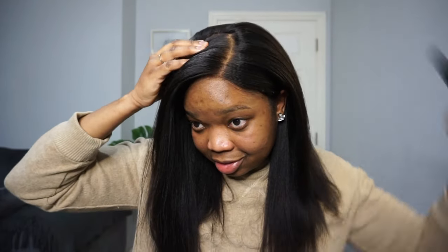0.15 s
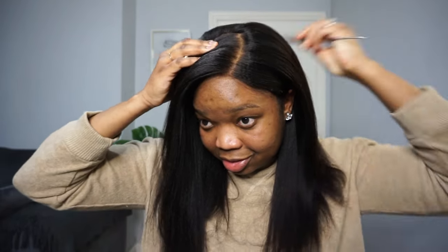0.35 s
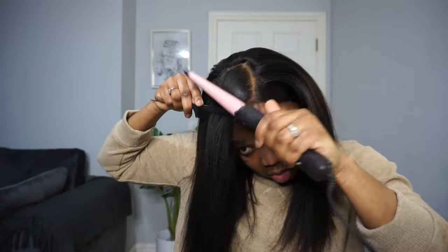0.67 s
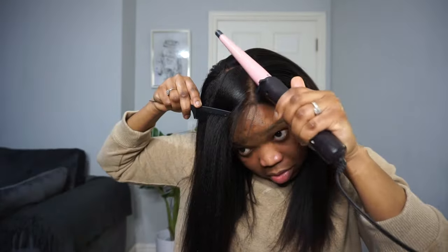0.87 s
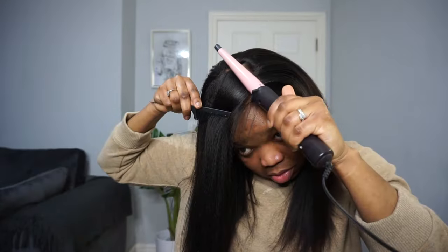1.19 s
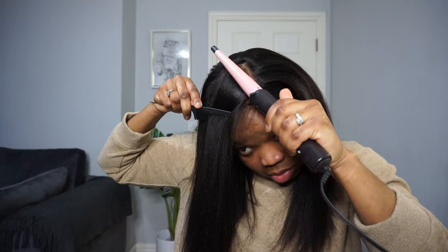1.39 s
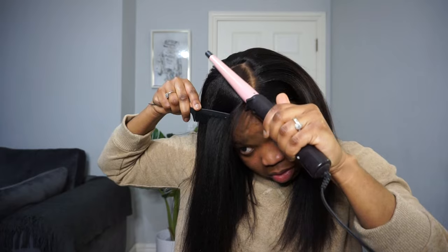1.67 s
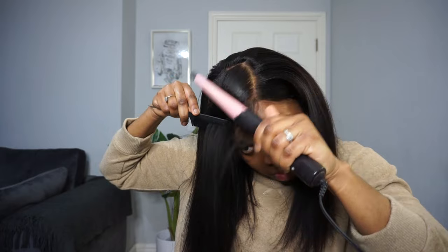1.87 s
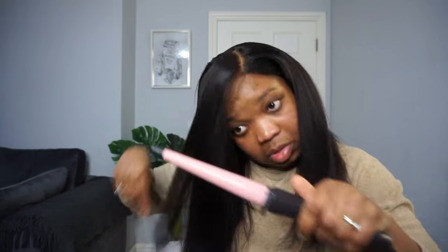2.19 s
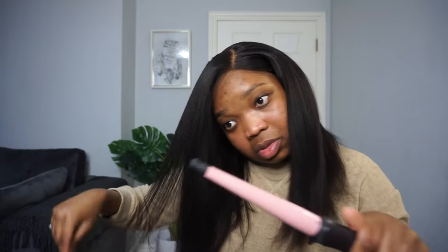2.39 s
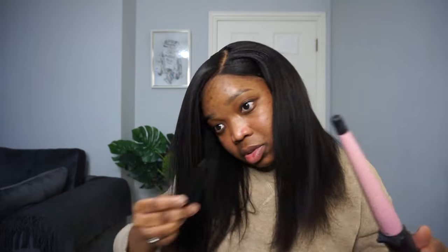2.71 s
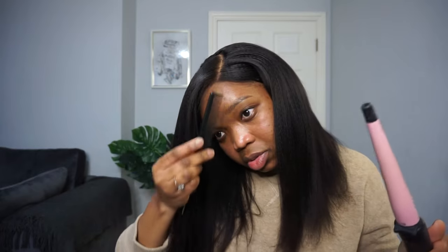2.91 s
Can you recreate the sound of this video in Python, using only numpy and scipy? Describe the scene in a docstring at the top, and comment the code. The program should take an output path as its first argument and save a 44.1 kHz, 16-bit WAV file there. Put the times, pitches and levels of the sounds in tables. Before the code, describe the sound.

Plastic hair tools knock lightly in a small room. Soft swishes of a comb through hair come first, then a few separate hollow knocks, then a quick clatter, with sleeves rustling near the microphone over faint hiss.

```python
"""In a small furnished room, hair is combed and curled while plastic tools and their cord knock about.
Each knock is a short crack with a hollow ring. It arrives dull along the partly blocked direct path,
then brighter off nearby walls. Between knocks, comb, hair and sleeves rub and swish softly, with one
light tick of the comb and one faint squeak. A low hiss and hum lie under it all."""
import sys
import numpy as np
from scipy import signal
from scipy.fft import rfft, irfft, next_fast_len
from scipy.io import wavfile

SR = 44100
rng = np.random.default_rng(int(sys.argv[2]) if len(sys.argv) > 2 else 0)


def generate_wav(sig):
    """Save sig (samples, or channels by samples) to the path in sys.argv[1] as 16-bit PCM at SR."""
    pcm = np.round(np.clip(np.atleast_2d(sig).T, -1, 1) * 32767).astype(np.int16)
    wavfile.write(sys.argv[1], SR, pcm)


N = 134505

# The tone of the crack when plastic is hit. Each row: frequency in Hz, gain in dB.
CRACK_TONE = [(50, -4), (100, -17.5), (220, 6), (380, 14.5), (560, 2), (1000, 6), (1500, 9), (2500, 9),
              (3500, 0), (5200, -2.5), (6400, -8), (8500, -12.5), (13500, -15.5), (16000, -35)]
# How alike the room sounds left and right. Each row: frequency in Hz, likeness (1 means the same).
ROOM_STEREO = [(150, 0.97), (400, 0.93), (700, 0.28), (1200, 0.44), (3000, 0.039), (12000, .02)]


def amp(db):
    """Turn decibels into a gain to multiply by."""
    return 10 ** (np.asarray(db) / 20)


def unit(x):
    """Scale a signal to an average (rms) level of 1."""
    return x / np.sqrt(np.mean(x ** 2))


def pan(db):
    """Left and right gains. A pan is how many dB louder the left side is than the right."""
    return amp(np.array([[db], [-db]]) / 2)


def fade(t, t60):
    """A smooth decay that falls 60 dB in t60 seconds, the fade time."""
    return np.exp(-np.log(1000) * t / t60)


def lookup(points, hz):
    """Read between the rows of a (Hz, value) table, with octaves evenly spaced."""
    freqs, values = np.array(points, float).T
    return np.interp(np.log(np.maximum(hz, 1)), np.log(freqs), values)


def colour(x, points):
    """Shape the tone of a sound with a (Hz, dB) curve."""
    n = 2 * next_fast_len(x.shape[-1])
    gains = amp(lookup(points, np.fft.rfftfreq(n, 1 / SR)))
    cepstrum = irfft(np.log(gains))
    cepstrum[1:n // 2] *= 2  # folded forward so the filter never rings ahead of the sound
    cepstrum[n // 2 + 1:] = 0
    return irfft(rfft(x, n) * np.exp(rfft(cepstrum)))[..., :x.shape[-1]]


def stereo_noise(n, likeness):
    """White noise whose two sides are as alike as a (Hz, likeness) table says."""
    alike = np.clip(lookup(likeness, np.fft.rfftfreq(n, 1 / SR)), -1, 1)
    mid, side = rfft(rng.standard_normal((2, n)))
    return irfft(mid * np.sqrt((1 + alike) / 2) + np.array([[1], [-1]]) * side * np.sqrt((1 - alike) / 2), n)


def add(out, x, start_s):
    """Mix x into out from a given time."""
    i = max(int(start_s * SR), 0)
    n = min(x.shape[-1], out.shape[-1] - i)
    out[..., i:i + n] += x[..., :n]


def place(x, pan_db, split_hz=660):
    """Pan a sound but leave its bass in the middle, as long waves reach both sides equally."""
    bass = signal.sosfilt(signal.butter(1, split_hz, fs=SR, output="sos"), x)
    return bass + (x - bass) * pan(pan_db)


def room_tone(t, air_db=-52, hum_db=-70.5, hum_hz=50):
    """Steady air, microphone hiss and a faint mains hum."""
    # The tone of the air and hiss. Each row: frequency in Hz, gain in dB.
    air_tone = [(15, 5), (25, -19.5), (91, -8.5), (126, -7.5), (156, -5), (274, -3), (359, -7),
                (523, -11.5), (970, -9.5), (1300, -8.5), (1410, -17), (9300, -19), (15500, -24)]
    # How alike their two sides are. Each row: frequency in Hz, likeness from 0 to 1.
    air_stereo = [(60, 1), (300, 0.28), (1000, 0.15), (3000, 0.067), (12000, 0.26)]
    air = unit(colour(stereo_noise(N, air_stereo), air_tone))
    hum = np.sqrt(2) * np.sin(2 * np.pi * hum_hz * t)
    return amp(air_db) * air * pan(0.5) + amp(hum_db) * hum


def room_tail(t, build_s=0.014):
    """The room's answer to a click: a blur of echoes builds up, then each octave dies away."""
    # How long the room rings. Each row: frequency in Hz, fade time in seconds.
    fade_times = [(100, 0.2), (260, 0.34), (700, 0.34), (1800, 0.25), (5000, 0.25), (14000, 0.22)]
    # Which way the echoes lean. Each row: frequency in Hz, pan in dB.
    lean = [(200, -0.5), (500, 1), (1000, -5.5), (2000, -2.5), (4000, -5), (10000, -1.5)]
    spectrum = rfft(stereo_noise(len(t), ROOM_STEREO))
    octave = np.log2(np.clip(np.fft.rfftfreq(len(t), 1 / SR), 125, 16000))
    build = 1 - np.exp(-(t / build_s) ** 2)
    tail = 0
    for hz in 125 * 2 ** np.arange(8):
        band = irfft(spectrum * np.maximum(1 - abs(octave - np.log2(hz)), 0), len(t))
        dying = unit(band * build * fade(t, lookup(fade_times, hz)))
        tail = tail + dying * band.std() * pan(lookup(lean, hz))
    return tail / np.sqrt(len(t))


def grain(depth_db=2, rate_hz=349):
    """A flickering gain: fibres quickly catch and slip."""
    steps = rng.standard_normal(N)
    flicker = np.interp(np.arange(N) / SR * rate_hz, np.arange(N), steps)
    return unit(amp(depth_db * flicker))


def rustle(t):
    """Clothes rub softly as the arms move."""
    # How loud the cloth is over time. Each row: time in seconds, level in dB.
    levels = [(0, -57), (.22, -51), (.55, -53.5), (.8, -57.5), (1.15, -57.5), (1.52, -55), (1.8, -59),
              (2.0, -54), (2.1, -47), (2.62, -50), (2.8, -54), (3.05, -55)]
    # The tone of the cloth. Each row: frequency in Hz, gain in dB.
    cloth_tone = [(60, -3), (200, -9), (600, 2.5), (1050, -2), (1800, -1), (2700, -2), (4500, -11),
                  (15000, -19.5)]
    cloth = unit(colour(stereo_noise(N, ROOM_STEREO), cloth_tone))
    level_db = np.interp(t, *np.array(levels).T)
    return cloth * grain() * amp(level_db) * pan(-3)


def squeak(length_s=0.1, pitch_hz=11300, level_db=-64):
    """A faint, thin, high squeak."""
    out, t = np.zeros((2, N)), np.arange(int(length_s * SR)) / SR
    tone = np.sin(2 * np.pi * pitch_hz * t) * signal.windows.tukey(len(t))
    add(out, amp(level_db) * tone, start_s=2.56)
    return out * grain()


def swishes(t):
    """Comb, hair and sleeves rub: each stroke is a band of grainy noise that swells and fades."""
    # Each row: time of the peak, rise and fall (all in seconds), level in dB,
    # centre and width of the band in Hz, pan in dB.
    strokes = [(.225, 0.096, 0.15, -47.5, 2510, 252, -5.5), (.208, .012, 0.055, -52, 4170, 3500, -8),
               (.405, 0.05, 0.087, -47, 3070, 1050, -8.5), (.538, 0.013, 0.039, -46.5, 2400, 3000, -5.5),
               (.536, 0.01, 0.012, -46, 13000, 2500, -5), (.55, 0.082, 0.068, -51, 12300, 3880, -5),
               (0.897, 0.023, 0.06, -46.5, 3240, 900, -6.5), (1.298, 0.023, 0.06, -46.5, 2350, 2500, -3),
               (1.927, 0.038, 0.047, -47, 2960, 1350, -6.5), (2.64, 0.2, 0.031, -54, 2490, 199, -5),
               (2.873, .002, 0.063, -42, 3240, 1020, -6.5)]
    out, hz = 0, np.fft.rfftfreq(2 * SR, 1 / SR) + 1
    for peak, rise, fall, db, centre_hz, width_hz, pan_db in strokes:
        resonance = 1 / (1 + 1j * (hz ** 2 - centre_hz ** 2) / (hz * width_hz * 2)) ** 2
        loop = irfft(rfft(stereo_noise(2 * SR, ROOM_STEREO)) * resonance)
        rub = np.take(loop, np.arange(N), axis=1, mode="wrap")
        swell = np.exp(-np.where(t < peak, ((peak - t) / rise) ** 2, (t - peak) / fall))
        out = out + amp(db) * pan(pan_db) * unit(rub) * swell
    return out * grain()


def comb_tick(pitch_hz=2830, rise_s=0.0015, level_db=-36):
    """One comb tooth pings lightly as it meets the hair, with little echo."""
    out, t = np.zeros((2, N)), np.arange(SR // 2) / SR
    grit = unit(colour(rng.standard_normal(len(t)), CRACK_TONE))
    tooth = np.sin(2 * np.pi * pitch_hz * t) + amp(-12.5) * grit
    ping = amp(level_db) * tooth * t / rise_s * np.exp(1 - t / rise_s)
    echo = signal.fftconvolve(ping[None], room_tail(t), axes=1)[:, :len(t)]
    add(out, pan(-8.5) * ping + amp(-10) * echo, start_s=0.6587)
    return out


def ring(modes, t):
    """A struck object rings with several pure tones, each fading at its own speed."""
    return sum(amp(db) * unit(np.sin(2 * np.pi * hz * t) * fade(t, t60)) for hz, db, t60 in modes)


def roughen(x, t, split_hz=1066):
    """Rough surfaces add a brief burst of grit to a blow's highs; the lows stay one smooth push."""
    low = signal.sosfilt(signal.butter(1, split_hz, fs=SR, output="sos"), x)
    high = x - low
    grit = unit(rng.standard_normal(len(t)) * fade(t, t60=0.019)) / np.sqrt(len(t))
    return low + amp(-6) * high + amp(-2) * signal.fftconvolve(high, grit)[:len(t)]


def knocks(dull_above_hz=2830, thin_below_hz=109):
    """Plastic tools crack and ring, heard directly, off nearby walls and as the room's blur of echoes."""
    # Each row: start in seconds, then in dB the gains of the thump, thud, body, clack and edge,
    # the gain of the direct path, the gain of the barrel's ring, and the pan.
    blows = [(0.9072, -1, -1, -5, -6.5, -11, 2, 1.5, -1.5),
             (1.3054, -11.5, -10.5, -6.5, -4, 1, -0.5, -25, -2),
             (1.485, -15.5, -21.5, -34, -30, -29, -0.5, -20, -4),
             (2.043, -29, -19, -41, -24, -47, 3, -20, -8),
             (2.109, -13, -8, -4.5, -4, -10.5, -0.5, -5.5, -2), (2.1613, 3, -5.5, -13.5, 0, -8, 6, -13, 1),
             (2.219, -12, -19, -4.5, -12, -12, 1, -20, 0), (2.2368, -27, -21, -17, -24, -21, 3, -18, -20),
             (2.2475, 5, 8, 0.5, 1, -3, 4, -3.5, -12), (2.253, 4.5, 5, 2.5, -3, -2.5, 6.5, -1.5, 17),
             (2.2634, -5, -6.5, -5, 1, -0.5, 4, 0, -10.5),
             (2.4102, -12.5, -19, -16, -22, -25, 4.5, -17, -8),
             (2.4350, -4.5, -6.5, -7.5, -2.5, -13, 3, -31, -4),
             (2.4573, -12.5, -11, -12, -4, -13, 6.5, -25, 1),
             (2.485, -21, -15, -15.5, -15, -22, 6, -20, -2),
             (2.7401, -15.5, -20, -12.5, -7, -11, 3, -25, -7.5)]
    # The centres of the thump, thud, body, clack and edge, in Hz.
    bands_hz = [170, 380, 850, 2100, 5500]
    # The ring of the plastic and its support. Each row: pitch in Hz, gain in dB, fade time in seconds.
    plastic_tones = [(146, -21.5, 0.3), (200.5, -10.5, 0.24), (332, -22, 0.081), (396, -36.5, 0.15),
                     (600, -16, 0.057), (896, -23, 0.15), (1180, -11.5, 0.0096), (1665, -11.5, 0.025),
                     (1960, -12.5, 0.03), (2260, -13, 0.02), (2690, -18.5, 0.023)]
    # The ring of the curling wand's barrel. Each row: pitch in Hz, gain in dB, fade time in seconds.
    barrel_tones = [(1436, -7.5, 0.14), (2820, -10, 0.046), (3393, -15, 0.062), (3490, -14, 0.039),
                    (4330, -14, 0.033), (7316, -19, 0.045)]
    # The first bounces off the walls. Each row: delay in seconds, gain in dB, extra pan in dB.
    wall_echoes = [(.0059, 1.5, -8), (0.0147, -7, 12), (.018, -14.5, -25), (.0218, -6, 3),
                   (0.0261, -9.5, -9)]
    out, t = np.zeros((2, N)), np.arange(SR // 2) / SR
    crack = colour(unit(signal.unit_impulse(len(t))), CRACK_TONE)
    plastic = crack + ring(plastic_tones, t)
    barrel = ring(barrel_tones, t)
    blocked_path = signal.butter(2, dull_above_hz, fs=SR, output="sos")
    bass_cut = signal.butter(3, thin_below_hz, "high", fs=SR, output="sos")
    for start, *bands_db, direct_db, barrel_db, pan_db in blows:
        # The hit's deepest bass is cut away.
        shake = signal.sosfilt(bass_cut, plastic + amp(barrel_db) * barrel)
        hit = colour(shake, list(zip(bands_hz, bands_db))) * amp(-4) / np.sqrt(len(t))
        direct = signal.sosfilt(blocked_path, roughen(hit, t))
        add(out, amp(direct_db) * place(direct, pan_db), start)
        for delay, echo_db, echo_pan_db in wall_echoes:  # each direction gets its own grit
            add(out, amp(echo_db) * place(roughen(hit, t), pan_db + echo_pan_db), start + delay)
        add(out, amp(5) * signal.fftconvolve(hit[None], room_tail(t), axes=1), start)
    return out


def scene():
    """All the sounds together at the microphone."""
    t = np.arange(N) / SR
    return knocks() + comb_tick() + swishes(t) + squeak() + rustle(t) + room_tone(t)


def record(dry, top_hz=15850):
    """The recorder cuts off the highest treble."""
    return signal.sosfilt(signal.ellip(10, .2, 80, top_hz, fs=SR, output="sos"), dry)


dry = scene()
out = record(dry)
generate_wav(out)
```